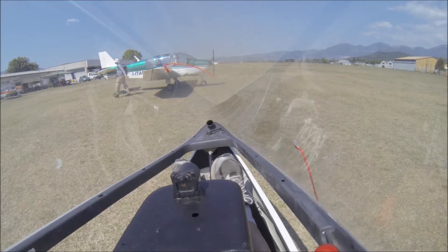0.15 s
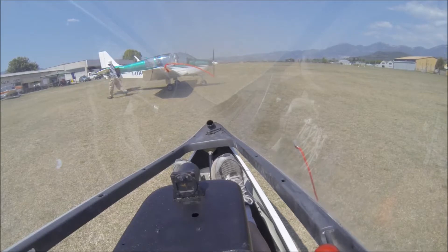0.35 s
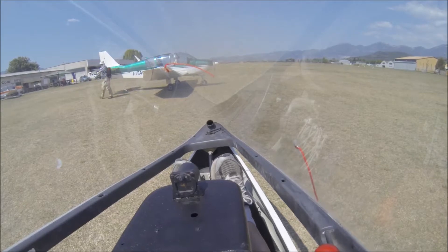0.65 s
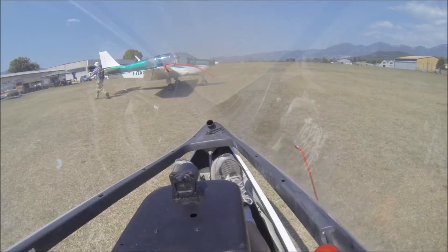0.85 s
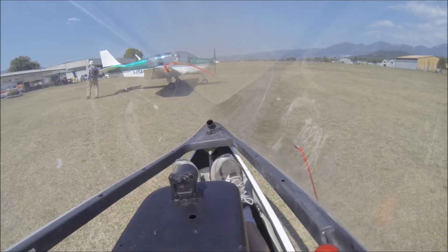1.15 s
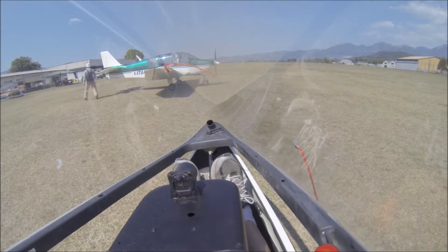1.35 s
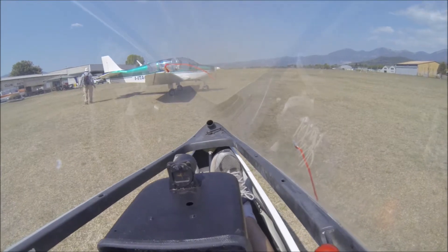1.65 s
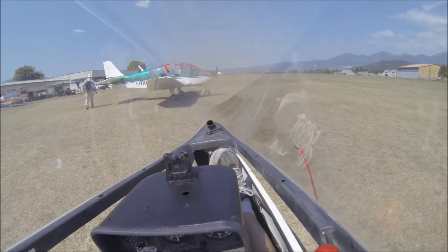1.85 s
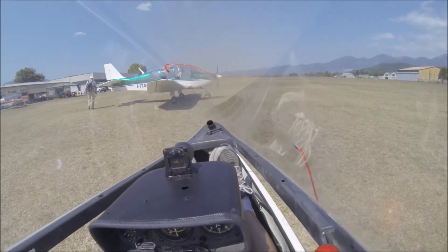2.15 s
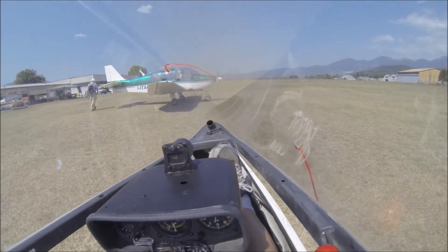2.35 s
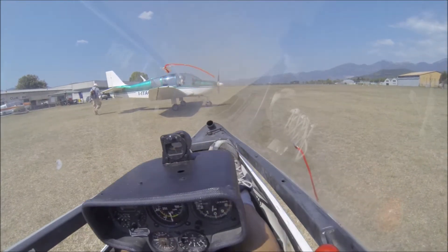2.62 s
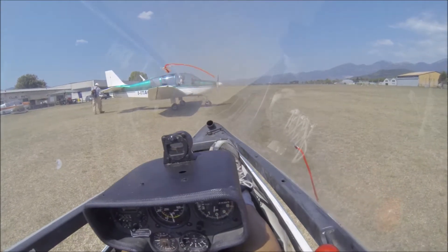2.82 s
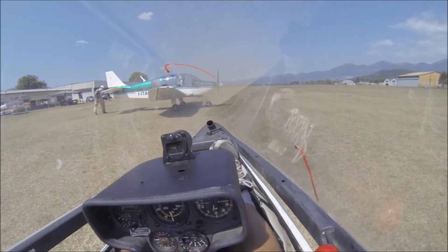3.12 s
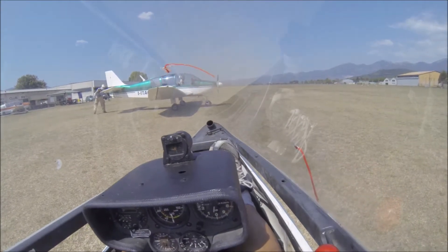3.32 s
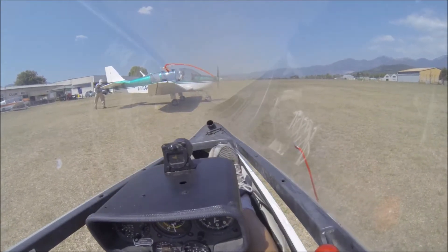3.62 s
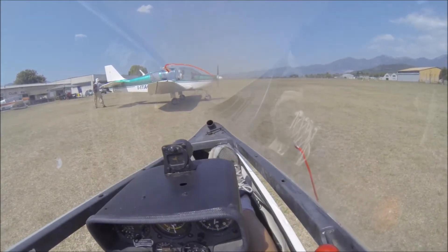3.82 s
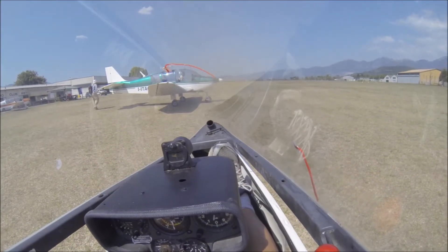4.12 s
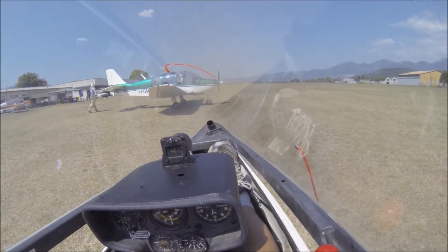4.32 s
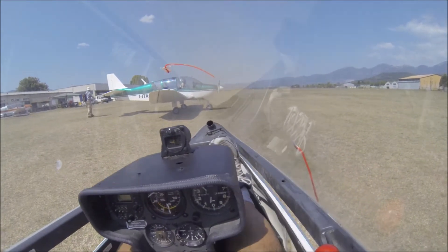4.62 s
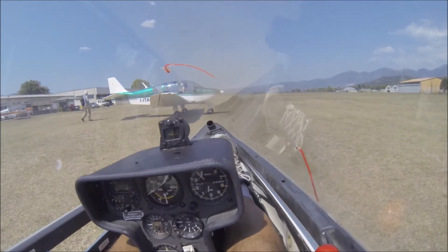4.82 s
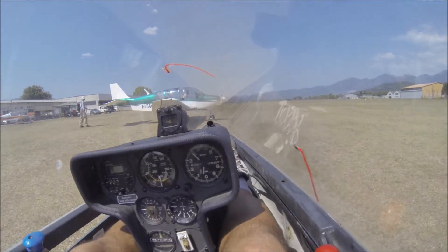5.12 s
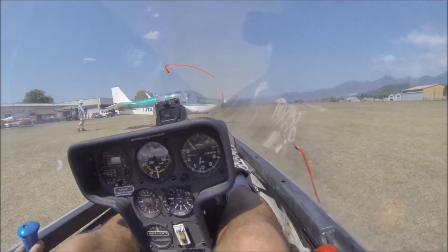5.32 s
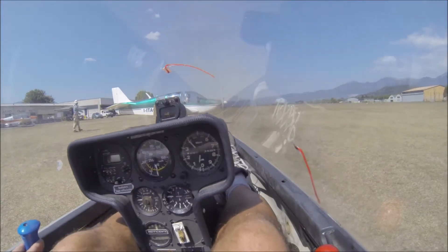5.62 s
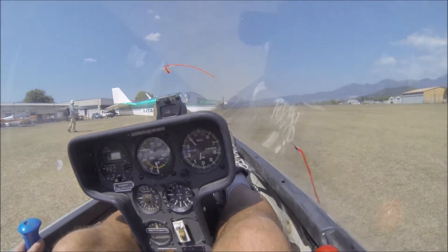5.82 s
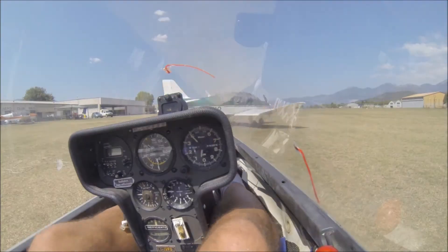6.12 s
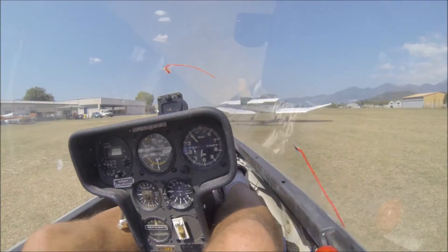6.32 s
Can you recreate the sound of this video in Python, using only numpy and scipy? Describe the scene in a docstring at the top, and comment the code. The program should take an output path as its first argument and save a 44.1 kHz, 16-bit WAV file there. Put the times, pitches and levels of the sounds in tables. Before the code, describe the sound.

Close knocks, creaks and metal clicks of a glider canopy being lowered, over the low rumble of a small plane idling ahead.

```python
"""A glider's canopy being worked down, heard at arm's length from one microphone inside the cockpit.
The shell knocks and booms, the frame rubs and creaks, and small metal fittings click. Farther off,
ahead on the grass airfield, the tow plane idles with a low throb and its propeller wash buffets the
airframe. A faint buzz and a thin electronic whine sit underneath.
The canopy lands with a clack, and the sound stops dead."""
import sys
import numpy as np
from scipy import signal
from scipy.fft import rfft, irfft
from scipy.io import wavfile

SR = 44100
rng = np.random.default_rng(int(sys.argv[2]) if len(sys.argv) > 2 else 0)


def bounce(signal):
    """Save signal as a 16-bit WAV file at the path given by the first command-line argument."""
    frames = np.transpose(np.atleast_2d(signal))
    limited = np.clip(frames, -1, 1)
    pcm = np.round(limited * 32767).astype(np.int16)
    wavfile.write(sys.argv[1], SR, pcm)


N = 285150
TIME = np.arange(N) / SR
STOP_S = 5.909
TICK_T60_S = .042

# hard knocks of the canopy on its frame: start_s, force_db, weight_db (sway over force), rim_db,
# rim_tilt_db_per_octave
KNOCKS = [(0.693, -35.5, 5.5, -40, -4.5), (.911, -28.5, -10, -40, 7), (2.629, -19.5, 4, -37, 3.5),
          (2.751, -24.5, 10.5, -41, 1.5), (2.793, -25.5, 10, -45.5, 0), (2.992, -29, 3, -40, 0),
          (3.132, -24, -3.5, -37, 2.5), (3.162, -28.5, -3, -40, 10), (3.511, -37, 20.5, -36.5, -15),
          (3.619, -31.5, 6, -36.5, 19.5), (5.272, -32.5, 15, -42.5, -17), (5.324, -29, 10.5, -37.5, -4),
          (5.763, -19, -6.5, -35.5, 5), (5.884, -25.5, -8, -36, 9)]
# soft, heavy shoves on the shell: start_s, sway_db, boom_db
THUMPS = [(0.817, -26.5, -48), (1.969, -29, -44), (3.014, -42, -16), (3.476, -27.5, -34.5),
          (4.024, -36, -30.5), (5.12, -18, -20.5), (5.238, -19, -44), (5.383, -21, -30.5),
          (5.782, -9.5, -33), (5.868, -9, -35.5)]
# strokes of the frame rubbing: start_s, length_s, groan_db, scrape_db, rasp_db
RUBS = [(1.061, 0.14, -54.5, -57, -63), (1.179, 0.1, -45, -54, -62), (1.31, 0.32, -52, -62, -68),
        (1.513, 0.15, -54, -58.5, -64), (2.634, 0.25, -38.5, -56, -77), (2.974, 0.022, -37, -62, -72),
        (3.009, 0.083, -43, -52.5, -44.5), (3.092, .085, -41, -53, -50.5), (3.169, 0.12, -48.5, -66, -69),
        (3.482, 0.13, -45, -49, -66), (5.233, .138, -34.5, -43, -61), (5.366, 0.16, -47, -58, -64),
        (5.675, 0.016, -34.5, -75, -80), (5.759, 0.19, -49.5, -53.5, -57)]
# clicks of the metal fittings: start_s, level_db, clack_over_tick_db
CLICKS = [(.107, -54, 8.5), (0.699, -46, 9.5), (2.6821, -41.5, 12), (2.856, -52, 0), (2.997, -42, 10.5),
          (3.009, -31, -1), (3.017, -38, 17.5), (3.026, -39.5, 17), (3.619, -43, -10), (3.849, -48, -10),
          (4.096, -52, 2), (4.221, -46.5, -13), (4.837, -45, -9), (5.887, -29, 15)]
# creaks of the rim in its seat: start_s, level_db
CREAKS = [(1.142, -44.5), (1.186, -42.5), (1.318, -49), (1.364, -43), (1.393, -41), (1.425, -49.5),
          (1.451, -47.5), (1.516, -54), (1.584, -45), (1.623, -47.5), (2.422, -48.5), (3.261, -42.5),
          (5.086, -51.5)]

# modes of the parts around the microphone: pitch_hz, relative_db, t60_s
SWAY_MODES = [(45.8, -7.5, 0.32), (54.2, -10.5, 0.17)]  # the whole shell on its hinge
AIR_MODES = [(111.8, 10.5, 0.24), (129, -8, 0.34)]  # the cockpit air
PANEL_MODES = [(214, -9.5, 0.2), (277.6, 3.5, 0.18), (322, -2.5, 0.069), (349, 4.5, 0.052),
               (363, -2.5, 0.067), (530, -15, 0.055)]
RIM_MODES = [(608.4, 6, 0.027), (783, -9, 0.13), (958, -11.5, 0.062), (1079.3, 1, 0.028),
             (1302, -1, 0.0093), (1535, -4.5, 0.017), (1730, -3, 0.025), (1840, -4.5, 0.016),
             (2157, -22, 0.024)]
FRAME_MODES = [(980, -2, 0.096), (1176, 4, .03), (1272, -3, .04), (1451, 7.5, 0.025), (1770, -6.5, 0.045)]  # the metal frame
LOOSE_FITTING_MODES = [(2366, 7, 0.017), (2660, -2, 0.014), (2935, -5.5, 0.043), (3380, 1, 0.027),
                       (3596, -4, 0.016), (4520, -11.5, 0.025), (6650, -14, .03)]

# noise spectra at the microphone: frequency_hz, relative_density_db
SCRAPE_SPECTRUM = [(200, -11.5), (400, 9), (480, 5), (600, 1.5), (820, -5), (980, 2), (1400, -7),
                   (1800, -4), (2400, -19), (2900, -19), (4500, -35.5), (12000, -47.5)]  # the rubbing frame
TICK_SPECTRUM = [(300, -21), (900, -2.5), (2400, 7), (3600, -1), (5000, -11.5), (7000, -13), (11000, -30),
                 (15000, -42)]  # a small fitting
CLACK_SPECTRUM = [(400, -16), (750, -1.5), (1100, 11), (1350, 12.5), (1700, -20.5), (2600, -26),
                  (5000, -40)]  # the part that carries it
EXHAUST_SPECTRUM = [(100, -37), (155, -3.5), (195, 2.5), (222, -10.5), (260, -4), (375, -2), (435, -14),
                    (495, -10), (560, -16), (860, -19), (1150, -14.5), (1650, -17), (2000, -25.5),
                    (3300, -28), (4100, -35.5), (11200, -39.5), (15000, -62)]
BUFFET_SPECTRUM = [(8, -15), (32, -10), (46, -5), (58, -12.5), (80, -17.5), (108, -10), (135, -26),
                   (170, -26), (400, -81.5)]  # propeller wash on the airframe

# idle speed, two crank turns to a cycle: time_s, cycle_rate_hz
IDLE_SPEED = [(0, 8.22), (1.4, 8.22), (2.6, 8.17), (4.4, 8.1), (5.9, 8.09)]
# engine harmonics as they reach the cockpit: multiple_of_cycle_rate, level_db
ENGINE_HARMONICS = [(5, -43), (6, -65.5), (8, -42.5), (9, -76), (10, -65), (11, -71), (12, -42), (13, -40),
                    (14, -58.5), (15, -51.5), (16, -47.5), (19, -63.5), (20, -67.5), (21, -67.5),
                    (23, -60.5), (27, -74), (31, -76.5), (32, -68.5), (33, -61.5), (40, -76.5)]
# shudder of the airframe: time_s, level_db
SHUDDER_LEVEL = [(0, -22.5), (.6, -34.5), (1.2, -39), (5.9, -37.5)]
# thin electronic tones: pitch_hz, level_db
WHINE_TONES = [(5650, -78), (11300, -82.5)]
# reflections off the canopy and cockpit walls: delay_s, gain
COCKPIT_ECHOES = [(.0029, 0.005), (.0051, -0.12), (.0083, 0.2), (0.0124, 0.12)]


def knocks(boom_db=-8.5, boom_per_weight=0.16):
    """Close knocks: force rings the panels, weight swings the shell and the air, contact rings the rim."""
    out = np.zeros(N)
    for start_s, force_db, weight_db, rim_db, tilt_db in KNOCKS:
        air_db = force_db + boom_db + boom_per_weight * weight_db
        add(out, start_s, shell(force_db + weight_db, air_db, force_db))
        rim = ring(tilted(RIM_MODES, tilt_db), scatter_db=1.5, lag=.13, rise_cycles=3)
        add(out, start_s, amp(rim_db) * rim)
    return out


def thumps(panel_over_boom_db=-19.5):
    """Cushioned shoves move the shell and the air but leave the rim silent."""
    out = np.zeros(N)
    for start_s, sway_db, boom_db in THUMPS:
        add(out, start_s, shell(sway_db, boom_db, boom_db + panel_over_boom_db))
    return out


def shell(sway_db, boom_db, panel_db):
    """One blow, heard from under the canopy: it sways on its hinge, the air booms, the panels ring."""
    sway = ring(SWAY_MODES, lag=.14, rise_cycles=0.64)
    boom = ring(AIR_MODES, lag=.13, rise_cycles=1.2)
    panels = ring(tilted(PANEL_MODES, tilt_db=5), scatter_db=3, lag=.16)
    return amp(sway_db) * sway + amp(boom_db) * boom + amp(panel_db) * panels


def rubbing(slips_per_s=700, smear=0.081, fade_db_per_s=-44.5):
    """Tiny uneven slips make the panels groan, scrape the frame and make the metal rasp."""
    out = np.zeros(N)
    for start_s, length_s, groan_db, scrape_db, rasp_db in RUBS:
        size = int(length_s * SR)
        slipping = rng.random(N)[:size] < slips_per_s / SR
        slip_db = np.minimum(rng.exponential(1, N)[:size], 3)
        grit = rng.standard_normal(N)[:size]
        slips = slipping * amp(slip_db) * np.sign(grit) + smear * grit
        stroke = signal.windows.tukey(size, .2) * amp(fade_db_per_s * TIME[:size])
        force = unit_rms(slips) * stroke
        add(out, start_s, amp(groan_db) * shaken(PANEL_MODES, force))
        add(out, start_s, amp(scrape_db) * coloured(slips, SCRAPE_SPECTRUM) * stroke)
        add(out, start_s, amp(rasp_db) * shaken(FRAME_MODES, force))
    return cockpit(out)


def fittings(trim_db=-7, rise_s=.0009, rasp_over_clack_db=-35, rasp_t60_s=0.26):
    """Each fitting ticks over the duller clack of its mount; harder clacks rattle the frame more."""
    out, t = np.zeros(N), np.arange(SR // 3) / SR
    envelope = (1 - np.exp(-t / rise_s)) * amp(-60 * t / TICK_T60_S)
    for start_s, db, clack_db in CLICKS:
        tick = coloured(rng.standard_normal(len(t)), TICK_SPECTRUM)
        clack = coloured(rng.standard_normal(len(t)), CLACK_SPECTRUM) * amp(clack_db)
        add(out, start_s, amp(db + trim_db) * envelope * (tick + clack))
        rasp_db = db + clack_db + rasp_over_clack_db
        rattle = rng.standard_normal(len(t)) * amp(rasp_db - 60 * t / rasp_t60_s)
        add(out, start_s, shaken(FRAME_MODES, rattle))
    return out


def creaks(rim_over_panel_db=2):
    """The rim sticks in its seat and lets go; each slip rings the rim and the panels."""
    out = np.zeros(N)
    for start_s, db in CREAKS:
        rim = ring(tilted(RIM_MODES, tilt_db=3), scatter_db=4.5, lag=.04, rise_cycles=2.5)
        add(out, start_s, amp(db + rim_over_panel_db) * rim)
        add(out, start_s, amp(db) * ring(PANEL_MODES, scatter_db=6, lag=0.124))
    return out


def tow_plane(throb_s=4.05, exhaust_db=-58, flutter_db=2.26, shudder_hz=13.1):
    """The engine idling ahead, from inside: throbbing harmonics, pulsing exhaust, a slow shudder."""
    cycles = engine_cycles()
    since_throb = cycles - np.interp(throb_s, TIME, cycles)
    throb = 0
    for order, db in ENGINE_HARMONICS:
        # the harmonics fall roughly into step once a cycle
        phase = order * since_throb + 0.34 * rng.random() + 0.013 * drift(3.8)
        waver = 1 + 0.022 * drift(12)
        throb = throb + amp(db) * waver * np.sin(2 * np.pi * phase)
    firing = 1 + 0.17 * np.cos(2 * np.pi * 4 * cycles)  # four firings a cycle
    exhaust = amp(exhaust_db + flutter_db * drift(35)) * unit_rms(cockpit(noise(EXHAUST_SPECTRUM)))
    shudder = amp(curve(SHUDDER_LEVEL)) * np.sin(2 * np.pi * shudder_hz * TIME)
    return throb + exhaust * firing + shudder


def engine_cycles():
    """Running count of the engine's cycles."""
    return np.cumsum(curve(IDLE_SPEED)) / SR


def buffeting(jolts, steady_db=-42, wobble_db=-8.5, wobble_s=0.13):
    """Propeller wash buffets the airframe, which wobbles harder for a moment after each jolt."""
    decay = np.exp(-1 / (wobble_s * SR))
    jolt_power = signal.lfilter([1 - decay], [1, -decay], jolts ** 2)
    level = np.sqrt(amp(steady_db) ** 2 + amp(wobble_db) ** 2 * jolt_power)
    return level * noise(BUFFET_SPECTRUM)


def stray_ticks(softest_db=-63, range_db=6, count=14):
    """Small loose parts around the cockpit tick faintly at random moments."""
    out, t = np.zeros(N), np.arange(SR // 8) / SR
    for when, strength in rng.random((count, 2)):
        tick = coloured(rng.standard_normal(len(t)), TICK_SPECTRUM) * amp(-60 * t / TICK_T60_S)
        add(out, when * STOP_S, amp(softest_db + range_db * strength) * tick)
    return out


def fitting_buzz(level_db=-76, shake_s=4.097, uneven_db=2):
    """Each engine cycle shakes a loose fitting near the microphone into a faint, uneven buzz."""
    cycles = engine_cycles()
    cycle_phase = (cycles - np.interp(shake_s, TIME, cycles)) % 1
    shake = .2 + np.exp(-cycle_phase / .09)
    chatter = rng.standard_normal(N) * shake * amp(uneven_db * drift(24))
    buzz = signal.fftconvolve(chatter, ring(LOOSE_FITTING_MODES, lag=0))[:N]
    return amp(level_db) * unit_rms(buzz)


def whine(chirps_per_s=24, jitter_cycles=.12):
    """Electronics by the microphone chirp thinly at a steady rate."""
    gate = np.exp(-((TIME * chirps_per_s % 1 - .5) / 0.15) ** 2)
    return gate * sum(amp(db) * np.sin(2 * np.pi * (hz * TIME + jitter_cycles * drift(60)))
                      for hz, db in WHINE_TONES)


def cockpit(x):
    """Hard walls close to the microphone colour the sound with a few early echoes."""
    return x + sum(gain * np.interp(TIME - delay_s, TIME, x, left=0) for delay_s, gain in COCKPIT_ECHOES)


def ring(modes, scatter_db=0., lag=0.1685, rise_cycles=1.0):
    """One blow on a group of modes, peak 1; slow, low bending waves arrive late and swell."""
    t, out = np.arange(SR // 2) / SR, 0
    first_arrival_s = lag / np.sqrt(RIM_MODES[-1][0])
    for hz, db, t60_s in modes:
        age = np.maximum(t - lag / np.sqrt(hz) + first_arrival_s, 0)
        swell = 1 - np.exp(-(age * hz / rise_cycles) ** 2)
        spot_db = scatter_db * rng.standard_normal()  # each spot favours other modes
        out = out + amp(db + spot_db - 60 * age / t60_s) * swell * np.sin(2 * np.pi * hz * age)
    return out / abs(out).max()


def shaken(modes, force):
    """A group of modes driven by a running force, at about the level of that force."""
    body = ring(modes)
    return signal.fftconvolve(force, body / np.linalg.norm(body))


def tilted(modes, tilt_db):
    """Harder contact favours the higher modes, by tilt_db per octave."""
    return [(hz, db + tilt_db * np.log2(hz / modes[0][0]), t60_s) for hz, db, t60_s in modes]


def coloured(x, spectrum):
    """Filters x by a spectrum table, to rms 1."""
    hz, db = np.transpose(spectrum)
    log_hz = np.log(np.fft.rfftfreq(len(x), 1 / SR) + 1)
    gain = amp(np.interp(log_hz, np.log(hz), db))
    return unit_rms(irfft(rfft(x) * gain, len(x)))


def noise(spectrum):
    return coloured(rng.standard_normal(N), spectrum)


def drift(rate_hz):
    """Random wander of rms 1, mostly slower than rate_hz."""
    hz = np.fft.rfftfreq(N, 1 / SR)
    return unit_rms(irfft(rfft(rng.standard_normal(N)) * np.exp(-(hz / rate_hz) ** 2), N))


def amp(db):
    return 10 ** (np.asarray(db) / 20)


def unit_rms(x):
    return x / np.sqrt(np.mean(x ** 2) + 1e-20)


def curve(rows):
    return np.interp(TIME, *np.transpose(rows))


def add(mix, start_s, sound):
    part = mix[max(round(start_s * SR), 0):][:len(sound)]
    part += sound[:len(part)]


def scene():
    """From the seat, in mono: the canopy at arm's length, the tow plane idling outside."""
    jolts = knocks() + thumps()
    background = tow_plane() + buffeting(jolts) + fitting_buzz() + whine()
    canopy = jolts + creaks() + fittings() + rubbing()
    return (canopy + background + stray_ticks())[None]


def record(dry, cutoff_hz=15500):
    """The microphone's signal stops dead at STOP_S and loses its highest treble."""
    lowpass = signal.firwin(511, cutoff_hz, window=("kaiser", 9), fs=SR)
    return signal.oaconvolve(dry * (TIME < STOP_S), lowpass[None], "same")


dry = scene()
out = record(dry)
bounce(out)
```